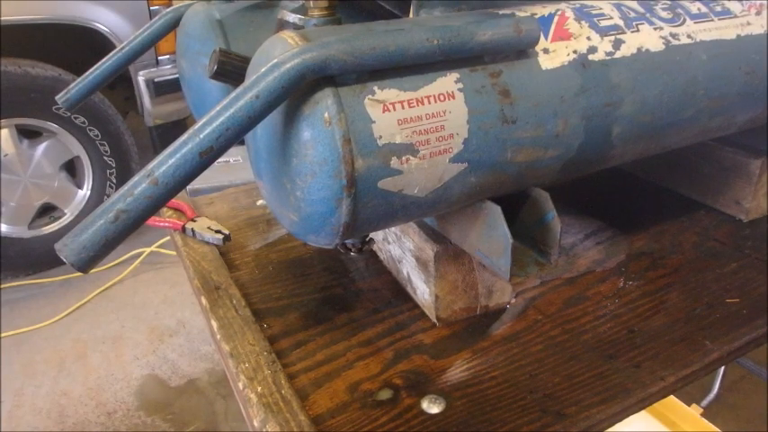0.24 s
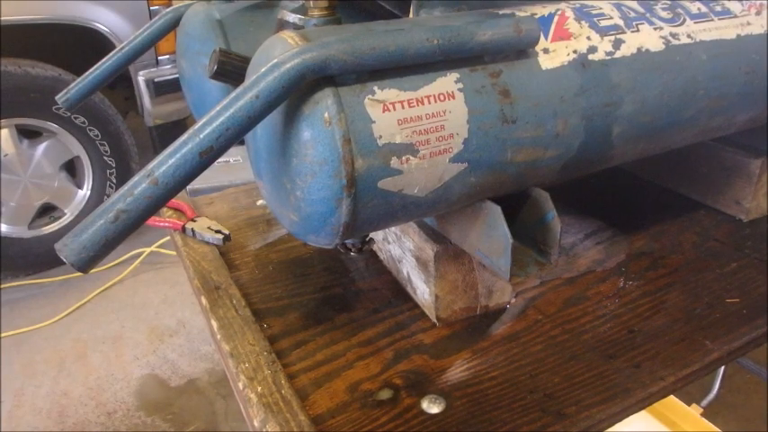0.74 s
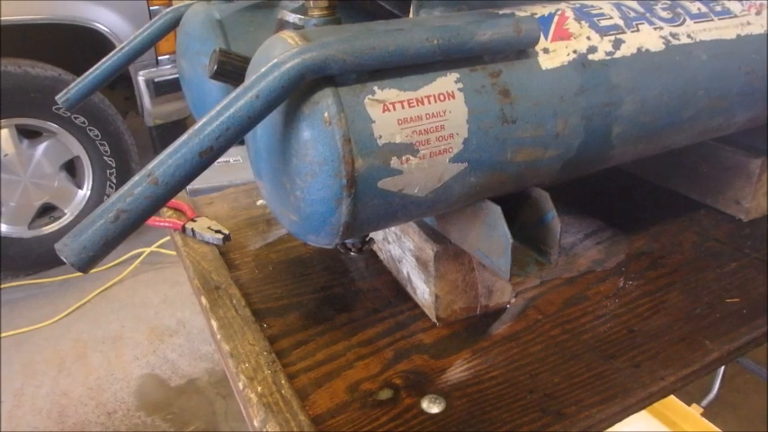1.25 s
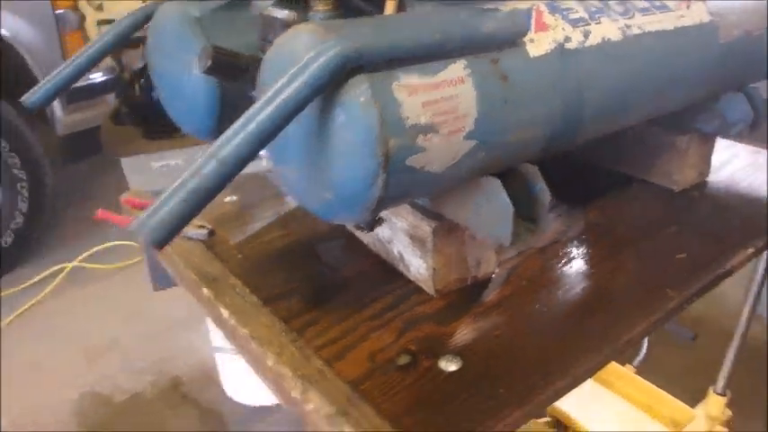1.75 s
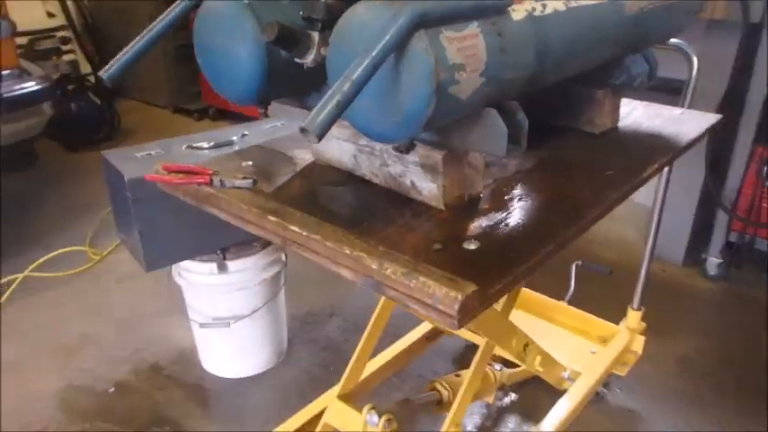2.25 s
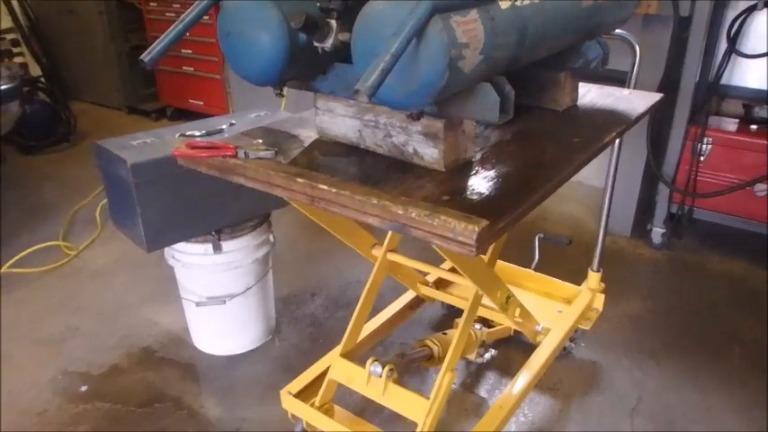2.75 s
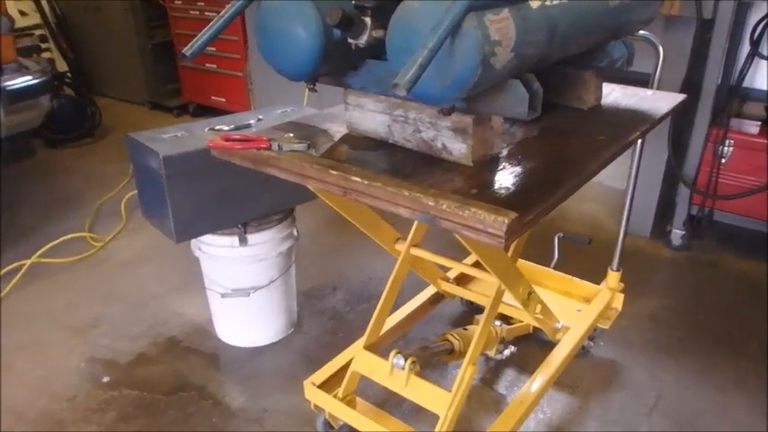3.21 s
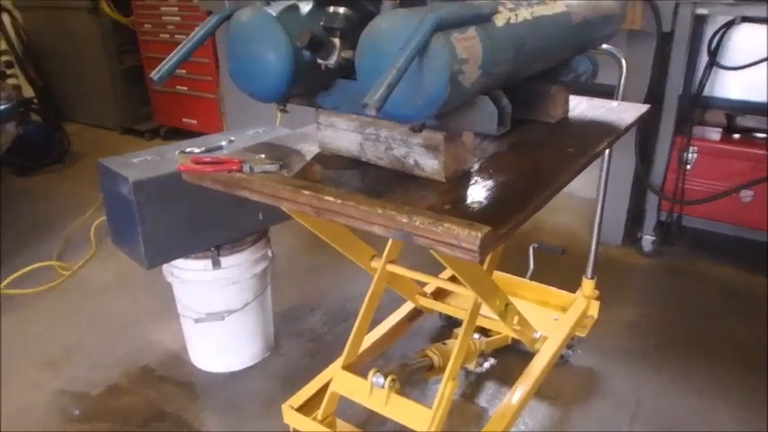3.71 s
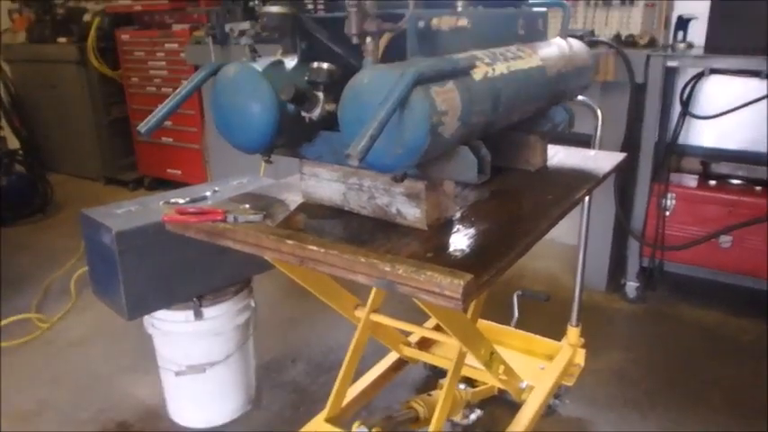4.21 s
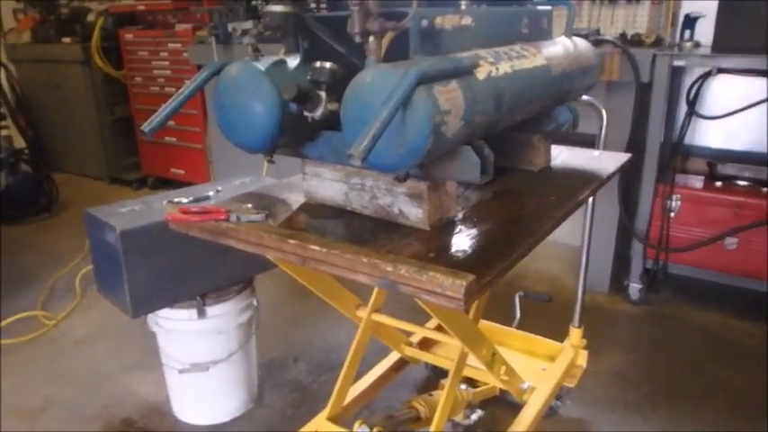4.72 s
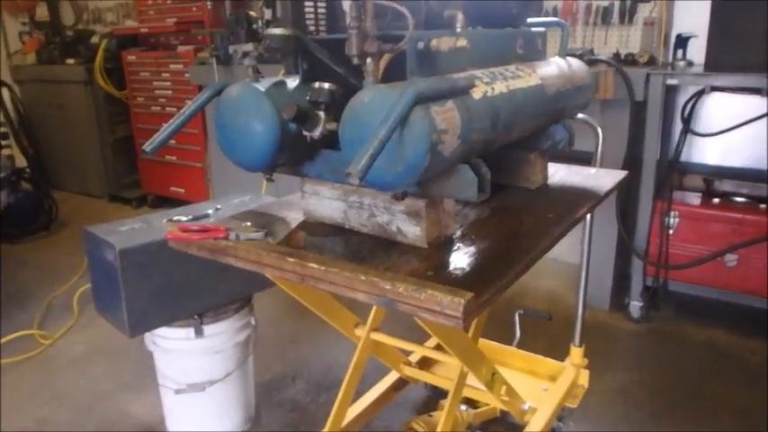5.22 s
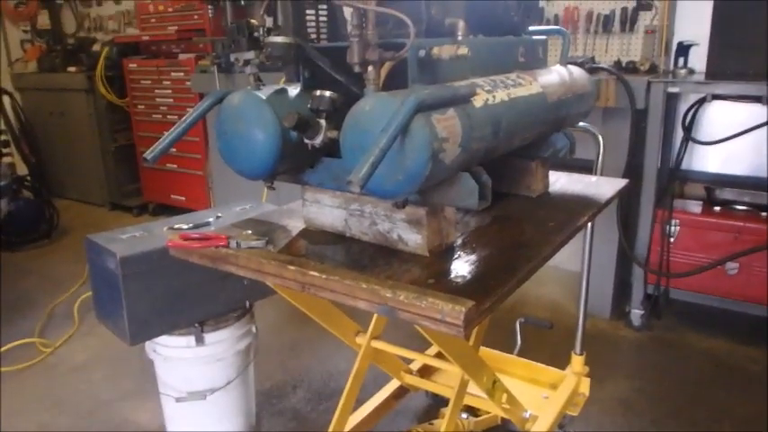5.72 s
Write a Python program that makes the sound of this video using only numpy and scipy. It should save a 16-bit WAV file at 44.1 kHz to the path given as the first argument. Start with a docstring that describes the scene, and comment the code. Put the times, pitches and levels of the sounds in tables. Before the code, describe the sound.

Compressed air escapes from a tank's open drain valve in a loud, bright, steady hiss, with a slight spitting of water. As the hand-held microphone backs away through the workshop, the hiss shifts in tone and a very faint whistle joins it. Low bumps and finger rubs come and go. One hard knock makes the hiss drop, and it swells back over about a second.

```python
"""Compressed air hisses from the open drain valve of a tank, spitting a little water and faintly whistling.
The tank stands on a wooden lift table in a workshop. A hand-held camera backs away, so echoes off the
table and the tank sweep through the hiss. The hand rubs and bumps the camera body; one hard knock makes
the camera's gain control turn the hiss down, and it swells back over a second."""
import sys
import numpy as np
from scipy import signal
from scipy.fft import rfft, irfft, next_fast_len
from scipy.io import wavfile
from scipy.ndimage import uniform_filter1d, map_coordinates

SR = 44100
rng = np.random.default_rng(int(sys.argv[2]) if len(sys.argv) > 2 else 0)


def inscribe(sig):
    """Save sig as 16-bit PCM at rate SR to the path in sys.argv[1].

    A 1-D sig is mono; a 2-D sig holds one channel per row.
    Samples are clipped to [-1, 1] before scaling.
    """
    pcm = np.round(np.clip(np.atleast_2d(sig).T, -1, 1) * 32767)
    wavfile.write(sys.argv[1], SR, pcm.astype(np.int16))


N = 262832
TIME = np.arange(N) / SR
FFT_SIZE = next_fast_len(N + SR)
FREQ = np.maximum(np.arange(FFT_SIZE // 2 + 1) * SR / FFT_SIZE, 1)
SIDES = np.array([[1], [-1]])  # left, right
WALK_START_S, CLOSE_M = 1.545, 0.66  # when the camera starts backing away, and from how far


# The tone of the hiss beside the valve. Each row: frequency in Hz, relative level in dB.
CLOSE_TONE = [(30, -41), (100, -26.5), (300, -19.5), (550, -14), (860, -8.5), (1500, -9), (2000, -8),
              (2450, 2), (3450, 2.5), (5400, -4.5), (7000, -7.5), (9400, 0.5), (11200, 0), (12800, -10),
              (14600, -23)]
# The tone of the hiss a few steps back. Each row: frequency in Hz, relative level in dB.
FAR_TONE = [(100, -28), (420, -16), (860, -9), (1200, -8), (1700, -6), (2050, -8), (2450, 0.5), (3500, 2),
            (5300, -4), (7700, -8.5), (8700, -2), (10800, -0.3), (12900, -7.5), (13900, -9), (15000, -14)]
# Echoes off the wet table, then the tank. Each row: delay close by in milliseconds, then strength
# close by, midway and far off. A negative strength turns the wave upside down.
ECHOES = [(0.227, 0.18, 0.25, 0.064), (.317, -0.16, -0.19, 0.019)]

def air_jet(close_db=-20.5, far_db=-20, midway_dip_db=-2.5, surge_db=0.49, surge_hz=5):
    """The hiss changes tone with distance and mixes with its echoes, whose delays shrink further away."""
    far = farness()
    direct = np.sqrt(1 - far) * valve_hiss(CLOSE_TONE) + np.sqrt(far) * valve_hiss(FAR_TONE)
    hiss = direct
    for delay_ms, *strengths in ECHOES:
        echo = delayed(direct, delay_ms * CLOSE_M / distance())
        hiss = hiss + np.interp(far, [0, .5, 1], strengths) * echo
    midway = 4 * far * (1 - far)
    level_db = close_db * (1 - far) + far_db * far + midway_dip_db * midway
    return hiss * from_db(level_db + surge_db * drift(surge_hz))


# Pitches at which the valve and the tank ring. Each row: pitch in Hz, width in Hz, boost in dB.
VALVE_RESONANCES = [(870, 198, 5.5), (2850, 120, 2), (3324, 180, 4.5), (3630, 95, 3.5), (4380, 110, 2.5),
                    (5824, 410, 6.5), (7020, 760, 5.5), (8790, 530, 2)]

def valve_hiss(tone):
    """The hiss as heard at one spot in the room: the valve and tank boost some pitches of the jet."""
    tone_db = at_every_frequency(tone)[0]
    boost_db = sum(db / (1 + (2 * (FREQ - hz) / width) ** 2) for hz, width, db in VALVE_RESONANCES)
    spectrum = microphones(workshop(turbulence()), workshop(turbulence()))
    return irfft(spectrum * from_db(tone_db + boost_db), FFT_SIZE)[:, :N]


def turbulence(sputter_db=0.47, sputter_hz=22, drops_per_s=45, drop_db=-8.0, drop_s=0.0002):
    """Rushing air makes noise that flutters as water passes; each torn-off drop adds a short spit."""
    drops = (rng.random(N) < drops_per_s / SR) * rng.uniform(0, 1, N)
    spits = signal.lfilter([1], [1, -np.exp(-1 / (drop_s * SR))], drops)
    return rng.standard_normal(N) * (from_db(sputter_db * drift(sputter_hz)) + from_db(drop_db) * spits)


def whistle(hz=3338, ring_s=0.11, far_db=-39.5):
    """Air half catches a note on the valve's lip, heard once the camera is clear of the tank."""
    note = unit_level(ring(rng.standard_normal(N), hz, ring_s))
    return note * farness() * from_db(far_db)


# The hand bumps the camera. Each row: start in seconds, strength in dB, brightness (treble limit) in Hz.
HAND_BUMPS = [(1.7, -29.5, 300), (1.725, -24, 220), (1.743, -20, 283), (1.778, -28, 260),
              (2.176, -32.5, 230), (2.431, -34, 230), (3.344, -24.5, 262), (3.709, -33, 600),
              (3.977, -8.5, 6000), (4.13, -18.5, 248), (4.231, -37, 800), (4.886, -36.5, 505),
              (5.002, -15, 517), (5.016, -14.5, 110), (5.087, -31, 260), (5.463, -21.5, 170)]

def bumps(shudder_db=-6.0, shudder_s=0.041, shudder_hz=220):
    """Each bump pushes the camera body and leaves a brief shudder, different at each microphone."""
    force = np.zeros(N)
    for start_s, db, brightness_hz in HAND_BUMPS:
        click = from_db(db) * (np.arange(N) == round(start_s * SR))
        force += pass_band(click, brightness_hz, "low")
    decay = from_db(-60 / (shudder_s * SR))
    dying_away = signal.lfilter([np.sqrt(1 - decay ** 2)], [1, -decay], force)
    shudder = pass_band(dying_away * rng.standard_normal((2, N)), shudder_hz, "low")
    return camera_body(force + from_db(shudder_db) * shudder)


# The notes of the camera body. Each row: pitch in Hz, level in dB, ring time in seconds,
# how much louder on the left in dB.
BODY_NOTES = [(83, -4.5, 0.12, -3), (148, -3, 0.16, -3), (216, 1.5, 0.038, 0.5), (357, -1, 0.013, -1),
              (556, -4.5, 0.051, 2.5), (930, 6, 0.0043, -0.5), (1730, 2, 0.0039, -1), (2300, 1, 0.015, -6),
              (3350, 1.5, 0.0031, -2)]

def camera_body(force):
    """The body rings when pushed; a soft push stirs mainly the low notes, which lean to the right."""
    sound = np.zeros((2, N))
    for k, (hz, db, ring_s, left_db) in enumerate(BODY_NOTES):
        sign = (-1) ** (k + 1)  # neighbouring notes start in opposite directions
        sound += sign * ring(force, hz, ring_s) * from_db(db + SIDES * left_db / 2)
    return sound


# The tone of the grip's rumble. Each row: frequency in Hz, relative level in dB,
# how much louder on the left in dB.
GRIP_TONE = [(20, -3, 11), (40, 4, -12), (80, 1.5, -8), (120, 3, 3), (170, 4.5, -6), (253, -19, 0),
             (343, -14, 4), (700, -29, 0), (2000, -60, 0)]

def grip(lumps_db=3.0, lumps_hz=14, stereo_spread=0.4):
    """Fingers creep over the camera body and make a low, lumpy rumble."""
    tone_db, left_db = at_every_frequency(GRIP_TONE)
    noise = rng.standard_normal(FFT_SIZE) + stereo_spread * rng.standard_normal((2, FFT_SIZE))
    rumble = irfft(rfft(noise) * from_db(tone_db + SIDES * left_db / 2), FFT_SIZE)[:, :N]
    return unit_level(rumble) * rubbing() * from_db(lumps_db * drift(lumps_hz))


# Fingers rub the camera. Each row: start in seconds, length in seconds, level in dB.
FINGER_RUBS = [(1.615, 1.9, -48.5), (1.673, 0.16, -41.5), (2.12, 0.34, -40), (2.6, 0.064, -41.5),
               (3.71, 0.069, -42.5), (4.03, .07, -31.5), (4.2, 0.24, -49.5), (4.89, 0.25, -49),
               (5.227, 0.094, -47), (5.47, 0.068, -42.5)]

def rubbing(still_hand_db=-82, tense_hand_db=-66, fade_s=.065):
    """How strong the rumble is: each rub swells, holds and fades above the level of the resting hand."""
    power = from_db(np.where(TIME < WALK_START_S, still_hand_db, tense_hand_db)) ** 2
    for start_s, length_s, db in FINGER_RUBS:
        before_s = np.maximum(start_s - TIME, 0)
        after_s = np.maximum(TIME - start_s - length_s, 0)
        power = power + (from_db(db) * np.exp(-(before_s + after_s) / fade_s)) ** 2
    return np.sqrt(power)


def workshop(x, ring_s=0.33, echo_db=-7, sway_radians=0.48, sway_hz=0.57):
    """The room adds a dying cloud of echoes, which shifts slowly as the camera sways."""
    tails = rng.standard_normal((2, SR // 2)) * from_db(-60 * TIME[:SR // 2] / ring_s)
    tails /= np.linalg.norm(tails[0])
    here, there = irfft(rfft(x, FFT_SIZE) * rfft(tails, FFT_SIZE), FFT_SIZE)[:, :N]
    blend = sway_radians * drift(sway_hz)
    echoes = np.cos(blend) * here + np.sin(blend) * there
    echo_gain = from_db(echo_db)
    return (x + echo_gain * echoes) / np.sqrt(1 + echo_gain ** 2)


# How the two microphone openings differ. Each row: frequency in Hz, how much louder on the left in dB,
# how far the left wave is ahead in radians, how alike the two sides are from 0 to 1.
MIC_OPENINGS = [(300, 0, 0, .93), (1000, 0, 0, .98), (2900, 0, 0, .995), (3450, 3.5, -.4, .9),
                (3700, 0, -1.1, .8), (3900, -5.5, 0, .8), (4350, -.3, 0, .98), (4950, -1.1, -.5, .85),
                (5400, -5, -.25, .8), (6700, -6.2, .27, .68), (7900, -6.5, .66, .66),
                (8700, -3.4, .66, .83), (10300, -6, 1.06, .62), (11500, -3.7, 1.3, .82),
                (12700, -.6, 1.33, .68), (14500, -.5, .4, .78)]

def microphones(shared, opposed):
    """Two openings hear slightly different hiss: mixes two noises into a left and a right spectrum."""
    left_db, lead, alike = at_every_frequency(MIC_OPENINGS)
    middle = np.sqrt((1 + alike) / 2) * rfft(shared, FFT_SIZE)
    side = np.sqrt((1 - alike) / 2) * rfft(opposed, FFT_SIZE)
    balance = np.sqrt(2 / (1 + from_db(-2 * SIDES * left_db)))
    return (middle + SIDES * side) * balance * np.exp(.5j * SIDES * lead)


def distance(retreat_m=1.29, slowing_s=3.93):
    """Metres from the valve: the camera waits, then backs away, briskly at first and ever more slowly."""
    walked_s = np.maximum(TIME - WALK_START_S, 0)
    return CLOSE_M + retreat_m * (1 - np.exp(-walked_s / slowing_s))


def farness(near_zone_m=.48):
    """Eases from 0 beside the valve to 1 once the camera has backed out of the near zone."""
    progress = np.clip((distance() - CLOSE_M) / near_zone_m, 0, 1)
    return np.sin(np.pi / 2 * progress) ** 2


def from_db(db):
    """Turns decibels into a number to multiply by."""
    return 10 ** (np.asarray(db) / 20)


def unit_level(x):
    """Scales a signal to an average (rms) level of 1."""
    return x / np.sqrt(np.mean(x ** 2) + 1e-20)


def at_every_frequency(rows):
    """Fills in each column of a table between its listed frequencies."""
    hz, *columns = np.transpose(rows)
    return [np.interp(np.log(FREQ), np.log(hz), column) for column in columns]


def pass_band(x, edge_hz, kind):
    """Keeps the "low" or the "high" side of a frequency."""
    return signal.sosfilt(signal.butter(2, edge_hz, kind, fs=SR, output="sos"), x + 1e-18)


def drift(rate_hz):
    """A random wobble of typical size 1, mostly slower than the given rate."""
    spectrum = rfft(rng.standard_normal(FFT_SIZE)) / (1 + (FREQ / rate_hz) ** 2)
    return unit_level(irfft(spectrum, FFT_SIZE)[:N])


def delayed(x, delay_ms):
    """Makes both channels late by a changing amount."""
    earlier = np.arange(N) - delay_ms * SR / 1000
    return np.array([map_coordinates(channel, [earlier], order=3) for channel in x])


def ring(force, hz, ring_s):
    """Each push starts a pure note that fades by 60 dB over the ring time."""
    decay, step = from_db(-60 / (ring_s * SR)), 2 * np.pi * hz / SR
    return signal.lfilter([0, np.sin(step)], [1, -2 * decay * np.cos(step), decay ** 2], force + 1e-18)


def scene():
    """The air jet in the room and the hand on the camera."""
    return air_jet() + whistle() + grip() + bumps()


def gain_control(x, threshold_db=-20.0, cut_per_db=1.18, attack_s=0.0094, recover_db_per_s=10.0):
    """A sudden peak above the bass makes the camera turn the volume down fast; it creeps back steadily."""
    power = uniform_filter1d(np.mean(pass_band(x, 400, "high") ** 2, axis=0), size=64)
    level_db = 10 * np.log10(np.maximum(power, 1e-12))
    cut_db = cut_per_db * np.maximum(level_db - threshold_db, 0)
    recovery_db = recover_db_per_s * TIME
    held_db = np.maximum.accumulate(cut_db + recovery_db) - recovery_db
    smoothing = np.exp(-1 / (attack_s * SR))
    return x * from_db(-signal.lfilter([1 - smoothing], [1, -smoothing], held_db))


# Narrow cuts with which the camera hides its own motor whine. Each row: pitch in Hz, width in Hz,
# depth in dB.
WHINE_CUTS = [(2200, 150, -26), (3100, 85, -15), (4100, 100, -14), (5100, 80, -16), (6100, 95, -17)]

def record(dry, ceiling=0.71, top_hz=15200):
    """The camera cuts narrow bands, turns down loud moments, rounds off peaks and drops the top treble."""
    for hz, width_hz, depth_db in WHINE_CUTS:
        stop = signal.butter(2, [hz - width_hz / 2, hz + width_hz / 2], "bandstop", fs=SR, output="sos")
        dry = from_db(depth_db) * dry + (1 - from_db(depth_db)) * signal.sosfilt(stop, dry)
    rounded = ceiling * np.tanh(gain_control(dry) / ceiling)
    return signal.sosfilt(signal.ellip(12, .1, 90, top_hz, fs=SR, output="sos"), rounded)


dry = scene()
out = record(dry)
inscribe(out)
```